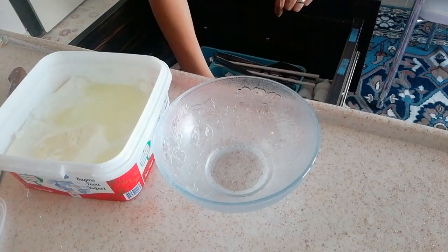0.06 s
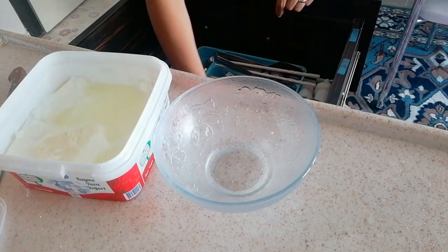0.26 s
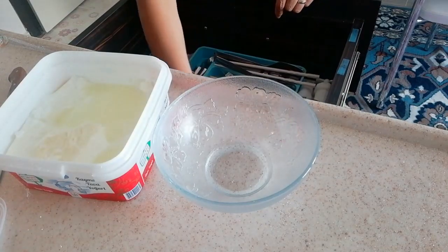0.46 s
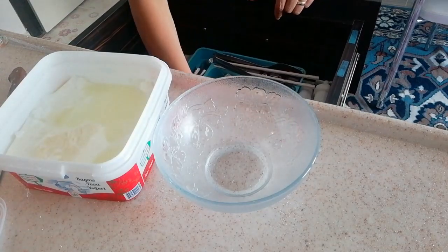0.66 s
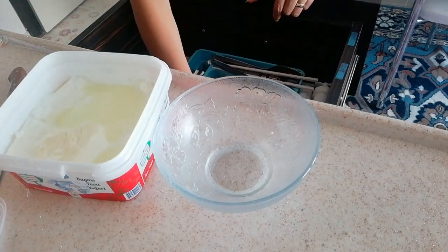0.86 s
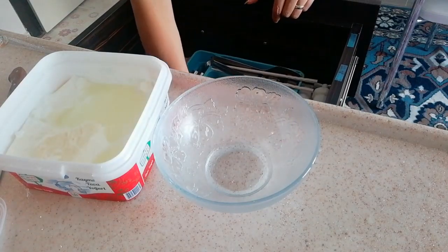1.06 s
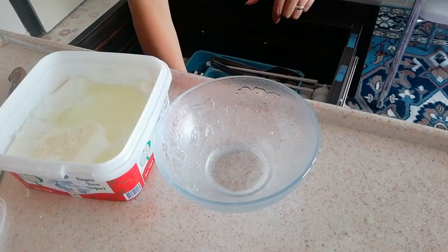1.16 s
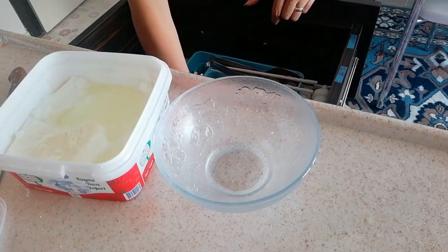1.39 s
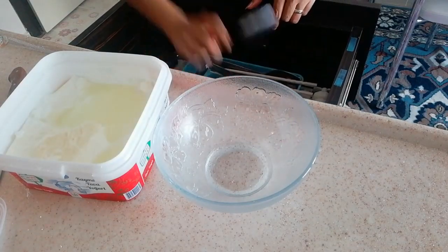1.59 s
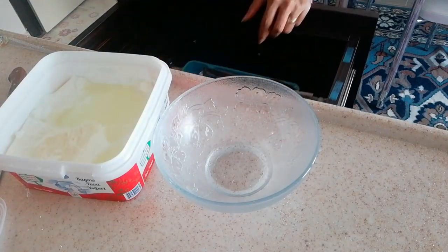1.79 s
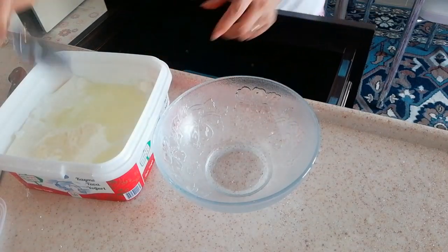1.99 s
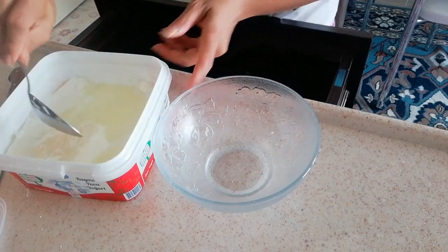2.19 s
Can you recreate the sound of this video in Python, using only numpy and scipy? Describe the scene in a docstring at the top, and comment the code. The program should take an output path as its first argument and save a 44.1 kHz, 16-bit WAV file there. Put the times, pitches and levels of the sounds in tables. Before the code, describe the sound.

Steel cutlery chatters and rings in a nearby drawer, with small plastic knocks and low thuds as a hand picks out a spoon. The drawer then slides closed with a soft rumble, over faint hiss in a hard-walled kitchen.

```python
"""A hard-walled kitchen: a hand rummages in the cutlery tray of an open drawer and lifts out a spoon.
Piled steel clinks and chatters, and a fork, a knife and a spoon ring on. Handles clack on the plastic
tray, one drops flat and sets its floor ringing, and the drawer thuds under the weight. Spoon bowls
clash as the spoon comes free, then the drawer rolls shut with a soft rumble from its runners.
The walls answer every hit; a faint hiss and hum lie underneath."""
import sys
import numpy as np
from scipy import signal
from scipy.fft import rfft, irfft
from scipy.io import wavfile

SR = 44100
rng = np.random.default_rng(int(sys.argv[2]) if len(sys.argv) > 2 else 0)


def log_audio(samples):
    """Write samples as a 16-bit WAV file to the path given in sys.argv[1]."""
    # one column per channel
    frames = np.atleast_2d(samples).T
    # limit to full scale, then quantise
    limited = np.clip(frames, -1, 1)
    pcm = np.round(limited * 32767).astype(np.int16)
    wavfile.write(sys.argv[1], SR, pcm)


N = 99225
T = np.arange(N) / SR
HZ = np.maximum(np.arange(N + 1) * SR / (2 * N), 1)

# Hit levels are set ahead of each layer's gain; focus_hz is the pitch a hit rings most.
# room tone colour: freq_hz, gain_db
ROOM_TONE_EQ = [(25, -8.5), (60, -4), (115, -0.5), (200, -9), (310, -3), (450, -7.5), (800, -10),
                (1000, -7.5), (1300, -13), (1750, -8.5), (2200, -2), (2900, -12.5), (4500, -12.5),
                (6800, -16), (7700, -15.5), (8300, -4), (8800, -19.5), (9400, -4), (10200, -12),
                (11500, -10.5), (12600, -19), (15500, -25)]
# the kitchen's decay: freq_hz, t60_s
KITCHEN_DECAY = [(100, 0.44), (260, 0.74), (700, 0.5), (1800, 0.31), (4800, 0.38), (12800, 0.2)]
# left-right likeness of diffuse sound: freq_hz, correlation
STEREO_LIKENESS = [(100, 1), (200, 0.95), (350, 0), (700, 0), (3000, 0)]

# weight landing on the drawer: start_s, level_db, focus_hz
DRAWER_THUDS = [(.004, -53.5, 330), (0.227, -51, 195), (0.286, -38, 182), (.335, -39.5, 183),
                (0.431, -48, 210), (0.564, -45, 165), (0.601, -54, 117), (0.846, -38.5, 172),
                (0.926, -31.5, 170), (0.948, -39.5, 242), (0.976, -50, 170), (1.046, -47, 235),
                (1.19, -48, 200), (1.434, -43, 130), (1.48, -44, 142), (1.53, -46, 196), (1.61, -50.5, 228),
                (1.688, -40.5, 124), (1.733, -42, 160), (1.787, -50, 286), (1.855, -44, 188),
                (1.900, -47, 126), (2.005, -46.5, 124), (2.047, -47, 106), (2.139, -52.5, 115)]
# the drawer's body modes: pitch_hz, level_db, t60_s
DRAWER_MODES = [(70.4, -22, .06), (98.3, -5, 0.29), (123.5, -3, 0.31), (169.4, 1, 0.22),
                (195.5, -3.5, 0.12), (219.8, -2, 0.092), (240.3, -8, 0.2), (283.4, -3.5, 0.26),
                (326.6, 0, 0.29), (456, 2.5, 0.14)]

# steel on steel: start_s, level_db, tilt_db_per_octave, chatter_s
STEEL_CLINKS = [(0.217, -44, -5, 0.014), (0.228, -31.5, 0, 0.0032), (0.248, -41.5, -4.5, 0.0027),
                (0.282, -29, -5, 0.0031), (.292, -28, -2.5, 0.045), (0.313, -34, -7, 0.017),
                (.334, -27.5, -2.5, 0.0021), (0.348, -34, 1, 0.003), (0.476, -44.5, -6, 0.036),
                (0.526, -46.5, -11.5, .012), (.541, -37, -2.5, 0.036), (0.562, -41.5, -9, 0.011),
                (0.577, -36.5, 1, 0.0051), (0.795, -24, -1, 0.018), (0.823, -23, -2.5, 0.014),
                (.843, -23.5, -4.5, 0.046), (0.867, -22.5, -2, 0.075), (0.896, -33, -13, 0.072),
                (0.927, -25, -5, 0.003), (.934, -22.5, -0.5, 0.022), (0.949, -27.5, 11, 0.029),
                (0.965, -30.5, 0, 0.022), (1.017, -33, -7, 0.0016), (1.031, -30, -7, 0.0022),
                (1.038, -22, -1, 0.0048), (1.043, -26, 19, 0.027), (1.078, -31.5, -2.5, 0.012),
                (1.115, -30, -2, 0.044), (1.202, -31, -1.5, 0.014), (1.228, -33, -3, 0.0061),
                (1.247, -25.5, 2, 0.0057), (1.263, -30, -2, 0.01), (1.282, -37.5, -1.5, 0.005),
                (1.302, -33, -2, 0.0017), (1.353, -38, 5, 0.0087), (1.36, -31, 0, 0.022),
                (1.387, -31.5, -1, 0.014), (1.410, -30.5, -5, 0.015), (1.434, -25.5, -3, 0.0046),
                (1.443, -22.5, 10, 0.0039), (1.461, -28.5, -7.5, 0.013), (1.483, -25, -1.5, 0.012),
                (1.501, -23.5, 4.5, 0.0091), (1.522, -26.5, -2.5, 0.0069), (1.583, -31.5, -2.5, 0.025),
                (1.685, -43, -11.5, 0.027), (1.708, -37, -2.5, 0.012), (1.722, -37, 10, 0.011)]
# colour of the steel heap: freq_hz, gain_db
STEEL_EQ = [(1800, -5), (2500, -13.5), (3200, -5.5), (4200, -3.5), (5000, -4), (5800, -6.5), (7000, -4),
            (8200, -0.5), (9300, 0.5), (10800, 4), (12600, 0.5), (14000, -7), (15500, -11.5)]
# the steel's highs lean left: freq_hz, left_minus_right_db
STEEL_PAN = [(3000, 0), (6500, 1), (8200, 1.5), (10000, 11), (15000, 9)]

# handles knocking on the tray: start_s, level_db, focus_hz
HANDLE_CLACKS = [(0.226, -46, 920), (.284, -41.5, 1030), (0.306, -38, 1020), (.326, -38.5, 960),
                 (.348, -41.5, 1060), (.402, -52, 1090), (0.5, -46, 1450), (0.561, -42, 1360),
                 (.799, -44, 1230), (0.823, -40, 1030), (0.851, -36.5, 1130), (.881, -29, 1280),
                 (0.911, -35.5, 1280), (.932, -37.5, 1050), (.942, -43.5, 614), (.957, -43, 1020),
                 (1.055, -39.5, 1140), (1.135, -44, 1180), (1.198, -45, 1140), (1.431, -33, 1270),
                 (1.481, -39, 1210), (1.506, -42, 874), (1.610, -45.5, 1120), (1.685, -41, 890),
                 (1.706, -40, 1130), (2.213, -58, 970)]
# the plastic tray's modes: pitch_hz, level_db, t60_s
TRAY_MODES = [(489, -7, 0.035), (618, -5, 0.05), (766, -3, 0.043), (897, -0.5, 0.034), (1018, 2.5, 0.033),
              (1154, -5, 0.026), (1318, 8.5, 0.026), (1472, 6.5, 0.024), (1666, -0.5, 0.05),
              (1862, -13, 0.11)]

# hits on pieces free to ring: start_s, level_db
FORK_STRIKES = [(.283, -40), (.934, -27), (1.040, -32)]
KNIFE_STRIKES = [(.797, -36), (.826, -32), (.868, -34), (1.040, -33), (1.228, -38), (1.249, -33)]
SPOON_STRIKES = [(1.362, -40), (1.447, -33), (1.485, -32), (1.502, -31), (1.523, -30)]
# their modes: pitch_hz, level_db, t60_s
FORK_MODES = [(2720, -9, .35), (4474, -9, .35), (6266, -4, .25), (7708, -1, .45), (8985, -1, .4),
              (10745, 3, .35), (11472, -2, .55), (12372, -2, .45), (15089, -6, .3)]
KNIFE_MODES = [(4904, -6, .3), (9860, -4, .25), (10001, 2, .3), (10139, -3, .25), (11290, -3, .3),
               (12600, -1, .35)]
SPOON_MODES = [(2700, -9, .3), (6605, -6, .4), (8570, -3, .3), (8975, -4, .3), (9392, -1, .5),
               (10602, 0, .35), (11434, -3, .35), (11745, -1, .35), (12543, 1, .3), (12745, 1, .35),
               (13532, -1, .42)]

# a handle landing flat: start_s, level_db
HANDLE_DROPS = [(.881, -25.5)]
# the tray floor's modes: pitch_hz, level_db, t60_s
TRAY_FLOOR_MODES = [(925, -4, .11), (1674, 1, .18)]

# spoon bowl against spoon bowl: start_s, level_db, focus_hz
BOWL_CLASHES = [(1.433, -28, 4100), (1.441, -25, 10500), (1.460, -29.5, 4100)]
# the bowls' modes: pitch_hz, level_db, t60_s
BOWL_MODES = [(3230, -10, .12), (3985, 0, .12), (4194, 1, .14), (4996, -7, .18), (10520, 2, .12)]

# rumble envelope of the rolling drawer: time_s, level_db
ROLL_ENVELOPE = [(1.67, -82), (1.70, -47.5), (1.91, -54.5), (1.98, -52), (2.08, -74), (2.25, -63)]
# colour of its runners: freq_hz, gain_db
RUNNER_EQ = [(45, -26), (85, -7), (118, 3.5), (175, -10.5), (310, -23), (450, -21), (1500, -32),
             (4000, -52)]

STEEL_RISE_S, TRAY_RISE_S = .003, .00096


def from_db(db):
    """Decibels to gain."""
    return 10 ** (np.asarray(db) / 20)


def at_hz(points, hz):
    """Read a table on a log-frequency axis."""
    freqs, values = np.transpose(points)
    return np.interp(np.log(hz), np.log(np.sort(freqs)), values)


def unit(x):
    """Scale to an average energy of 1 per channel."""
    return x / np.sqrt(np.sum(x ** 2) / len(np.atleast_2d(x)) + 1e-20)


def swell(rise_s, t):
    """A rounded attack: contact takes a moment to build."""
    return 1 - np.exp(-(t / rise_s) ** 2)


def fade(t60, t):
    """Exponential decay by 60 dB in t60."""
    return np.exp(-np.log(1000) * t / np.maximum(t60, 1e-3))


def colour(x, gain):
    """EQ a signal with a gain curve over HZ."""
    return irfft(rfft(x, 2 * N) * gain)[..., :N]


def pan(db):
    """Constant-power gains, left louder than right by db."""
    gains = from_db(np.array([[.5], [-.5]]) * db)
    return gains / np.sqrt(np.mean(gains ** 2, axis=0))


def place(out, start_s, db, hit, hold_s=.02):
    """Mix in a hit whose energy equals that level held for hold_s."""
    i = int(max(start_s, 0) * SR)
    out[:, i:i + hit.shape[-1]] += (from_db(db) * np.sqrt(hold_s * SR) * unit(hit))[..., :N - i]


def diffuse():
    """White stereo noise, alike in both channels only in the bass."""
    alike = np.clip(at_hz(STEREO_LIKENESS, HZ), -.99, .99)
    mid, side = rng.standard_normal((2, N))
    return colour(mid, np.sqrt(1 + alike)) + colour(side, np.sqrt(1 - alike)) * [[1], [-1]]


def noise_bed(eq):
    """Diffuse noise of that colour, rms 1."""
    return np.sqrt(N) * unit(colour(diffuse(), from_db(at_hz(eq, HZ))))


def struck(modes, hits, spread_db, width, rise_s, focus_db=0, detune=0):
    """Each hit rings its own blend of the modes; focus_db is the loss an octave from its focus_hz."""
    hz, mode_db, t60 = np.transpose(modes)
    t = T[:SR // 2]
    envelopes = fade(t60[:, None], t) * swell(rise_s, t)
    out = np.zeros((2, N))
    for start_s, level_db, *focus_hz in hits:
        strength, polarity, side, spot = rng.standard_normal((4, len(hz)))
        pitch_hz = hz * (1 + detune * spot)  # tuning shifts with the spot struck
        partials = np.sin(2 * np.pi * pitch_hz[:, None] * t) * envelopes
        loss_db = focus_db * sum(np.log2(hz / centre) ** 2 for centre in focus_hz)
        gains = np.sign(polarity) * from_db(mode_db + spread_db * strength - loss_db)
        stereo = np.cos(np.pi / 4 + width * side * np.array([[1], [-1]]))
        place(out, start_s, level_db, (gains * stereo) @ partials)
    return out


def room_tone(level_db=-53):
    """A steady bed of hiss and hum-like low noise, leaning left."""
    return from_db(level_db) * noise_bed(ROOM_TONE_EQ) * pan(4)


def drawer_thuds():
    """The drawer takes the weight and its body answers with soft, low knocks."""
    return struck(DRAWER_MODES, DRAWER_THUDS, spread_db=2.5, width=.13, rise_s=.0033,
                  focus_db=16, detune=.028)


def kitchen_reverb(build_s=.0032):
    """The hard walls' answer to a click: diffuse noise that dies band by band."""
    noise, tail = diffuse(), 0
    centres = np.geomspace(100, 12800, 8)
    for hz, share in zip(centres, np.eye(len(centres))):
        band = colour(noise, np.interp(np.log(HZ), np.log(centres), share))
        tail = tail + band * fade(at_hz(KITCHEN_DECAY, hz), T)
    return unit(tail * swell(build_s, T))


def chatter(t, chatter_s, graze_s, graze_rise_s=.0014, touches_per_s=900, touch_db=-8):
    """Contact impulses of two pieces: they graze, meet, then chatter to rest."""
    since_hit = t - graze_s
    pressure = np.exp(np.where(t < graze_s, since_hit / graze_rise_s, -(since_hit / chatter_s) ** 2 / 2))
    touching = rng.random(len(t)) < touches_per_s / SR
    touches = touching * rng.standard_normal(len(t)) * from_db(touch_db) * pressure
    touches[int(graze_s * SR)] = 1  # the main hit
    return touches


def steel_clinks(count=200, t60_s=.054, crack_s=.0058, graze_s=.008, low_cut_hz=1845):
    """Each clink's chatter excites a crack and a fresh set of short modes in the piled steel."""
    out, t = np.zeros((2, N)), T[:4096]
    size = 2 * len(t)
    hz = np.maximum(np.arange(len(t) + 1) * SR / size, 1)
    octaves = np.log2(np.maximum(hz, STEEL_EQ[0][0]))
    low_cut = np.exp(-(low_cut_hz / hz) ** 2)
    bands_hz = np.arange(0, SR / 2, 350)
    for start_s, level_db, tilt_db, chatter_s in STEEL_CLINKS:
        mode_hz = 2400 + 13600 * ((np.arange(count) + rng.random(count)) / count) ** .7
        gains = from_db(3.5 * rng.standard_normal(count)) * rng.choice([-1, 1], (2, count))
        ring = unit(gains @ np.sin(2 * np.pi * mode_hz[:, None] * t) * fade(t60_s, t))
        crack = from_db(-1) * unit(rng.standard_normal((2, len(t))) * np.exp(-t / crack_s))
        ping = (ring + crack) * swell(STEEL_RISE_S, t)
        touches = chatter(t, chatter_s, graze_s)
        # each pair of pieces favours its own bands
        pair_db = 3 * np.interp(hz, bands_hz, rng.standard_normal(len(bands_hz)))
        eq = from_db(at_hz(STEEL_EQ, hz) + tilt_db * octaves + pair_db) * low_cut
        clink = irfft(rfft(ping, size) * rfft(touches, size) * eq)[:, :len(t)]
        place(out, start_s - graze_s - STEEL_RISE_S / 2, level_db, clink)
    return out


def tray_clacks():
    """Handles knock on the plastic tray: a sharp attack and a short midrange ring."""
    return struck(TRAY_MODES, HANDLE_CLACKS, spread_db=1.5, width=.32, rise_s=TRAY_RISE_S,
                  focus_db=7.5, detune=.033)


def ringing_cutlery():
    """A fork, a knife and a spoon lie free enough to ring on at their own pitches."""
    pieces = [(FORK_MODES, FORK_STRIKES), (KNIFE_MODES, KNIFE_STRIKES), (SPOON_MODES, SPOON_STRIKES)]
    return sum(struck(modes, hits, spread_db=1, width=.3, rise_s=STEEL_RISE_S) for modes, hits in pieces)


def handle_drop():
    """One handle drops flat and sets the whole tray floor ringing."""
    return struck(TRAY_FLOOR_MODES, HANDLE_DROPS, spread_db=8, width=.23, rise_s=TRAY_RISE_S)


def bowl_clash():
    """Bowl strikes bowl hard as the spoon comes free."""
    return struck(BOWL_MODES, BOWL_CLASHES, spread_db=1, width=.3, rise_s=STEEL_RISE_S, focus_db=6)


def runner_rumble():
    """The runners rumble as the drawer rolls shut."""
    level_db = np.interp(T, *np.transpose(ROLL_ENVELOPE))
    return from_db(level_db) * noise_bed(RUNNER_EQ)


def scene():
    """Steel, tray and drawer hits feed the kitchen reverb, over room tone and runners."""
    reverb = kitchen_reverb()

    def in_room(x, gain_db, send_db):
        """A layer plus its reverb send."""
        wet = signal.fftconvolve(x, reverb, axes=1)[:, :N]
        return from_db(gain_db) * (x + from_db(send_db) * wet)

    # freely ringing pieces lie on top and are heard more directly
    rings = in_room(ringing_cutlery() + bowl_clash(), gain_db=-3.5, send_db=-6)
    clinks = in_room(steel_clinks(), gain_db=-.5, send_db=.5)
    steel = colour(clinks + rings, pan(at_hz(STEEL_PAN, HZ)))
    clacks = in_room(tray_clacks(), gain_db=-5.5, send_db=3)
    drop = in_room(handle_drop(), gain_db=-5.5, send_db=-6)
    drawer = in_room(drawer_thuds(), gain_db=-2, send_db=-7)
    return steel + clacks + drop + drawer + room_tone() + runner_rumble()


def record(dry, cutoff_hz=15600):
    """A steep low-pass trims the very top of the mix."""
    return signal.sosfilt(signal.ellip(12, .1, 80, cutoff_hz, fs=SR, output="sos"), dry)


dry = scene()
out = record(dry)
log_audio(out)
```